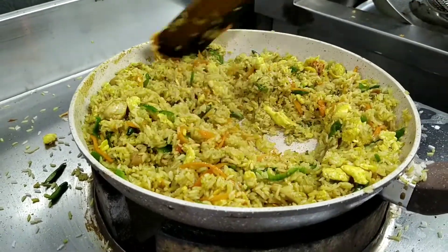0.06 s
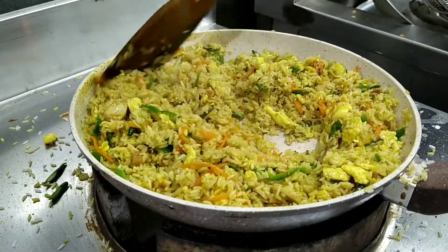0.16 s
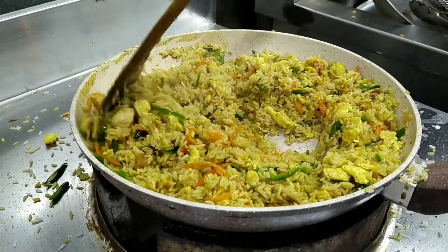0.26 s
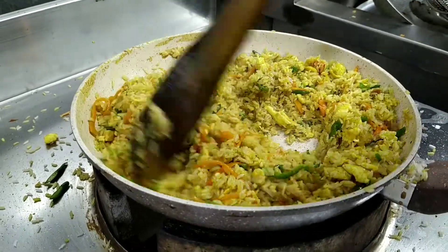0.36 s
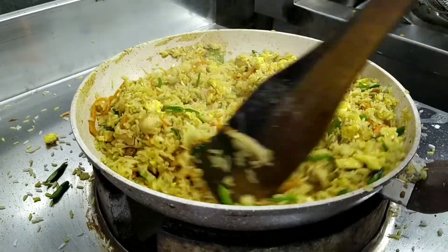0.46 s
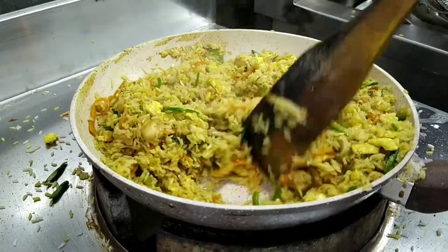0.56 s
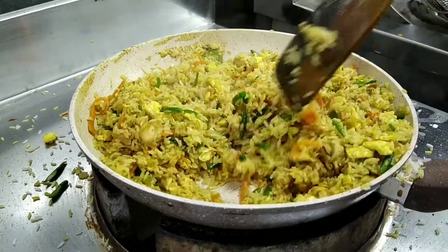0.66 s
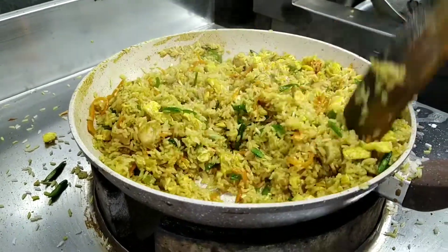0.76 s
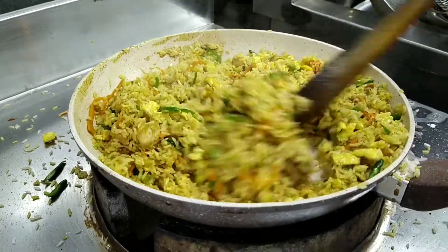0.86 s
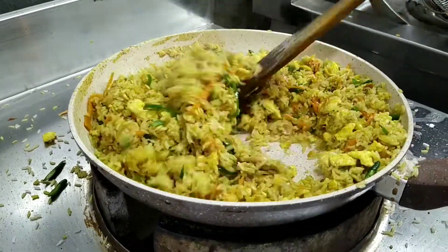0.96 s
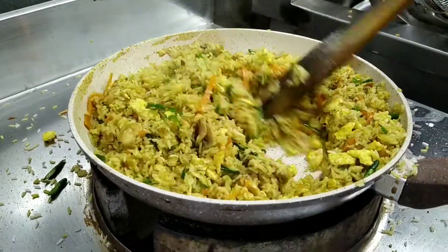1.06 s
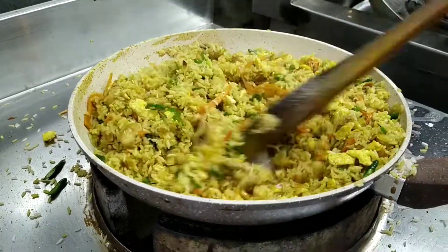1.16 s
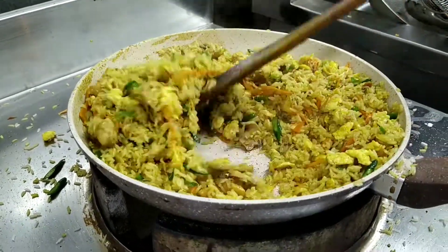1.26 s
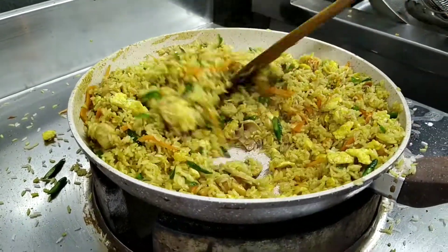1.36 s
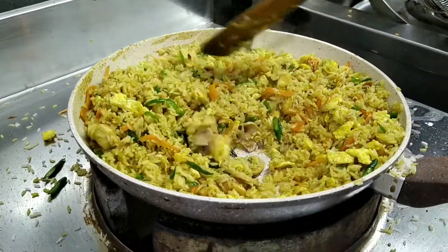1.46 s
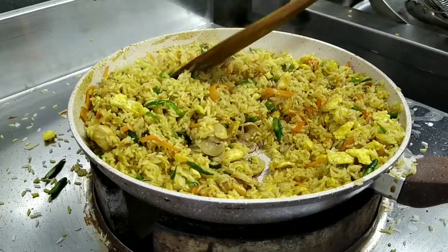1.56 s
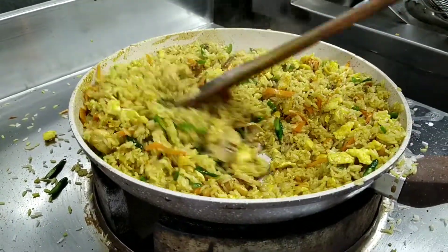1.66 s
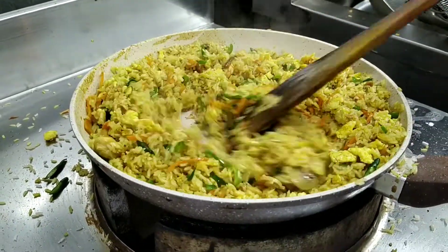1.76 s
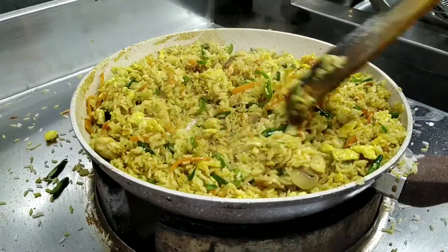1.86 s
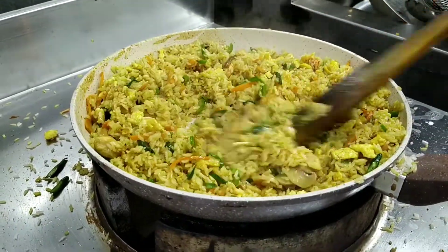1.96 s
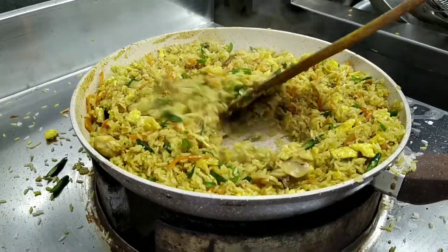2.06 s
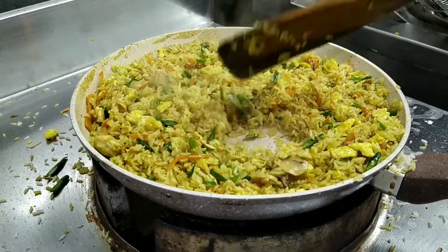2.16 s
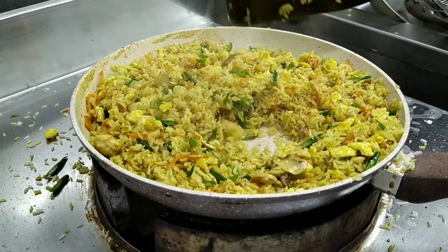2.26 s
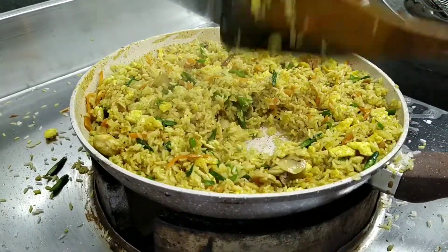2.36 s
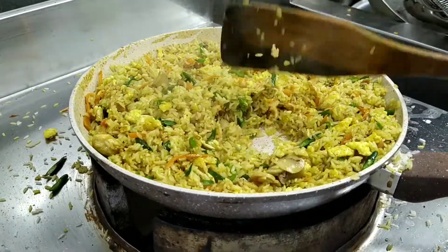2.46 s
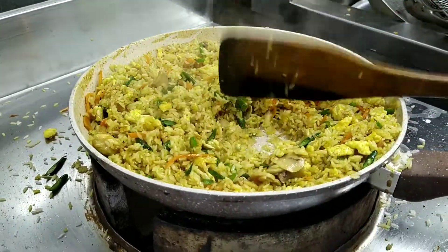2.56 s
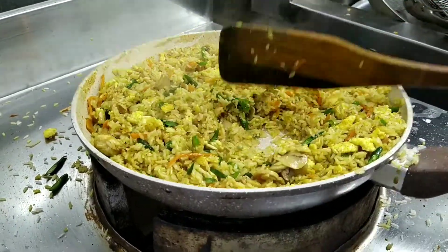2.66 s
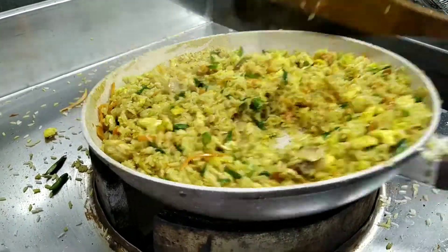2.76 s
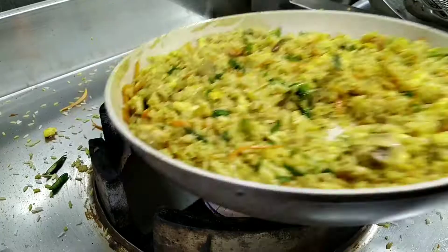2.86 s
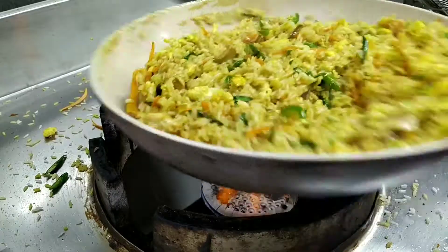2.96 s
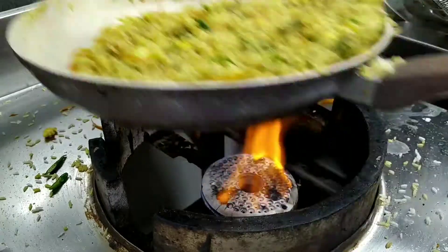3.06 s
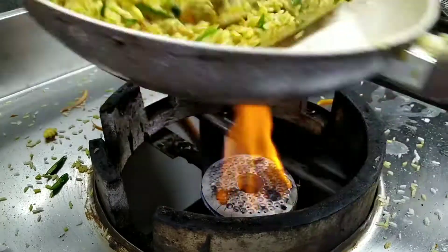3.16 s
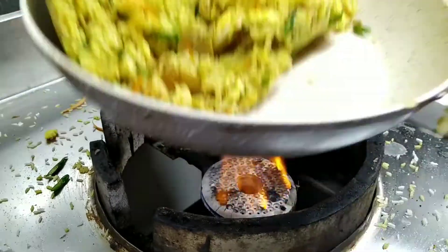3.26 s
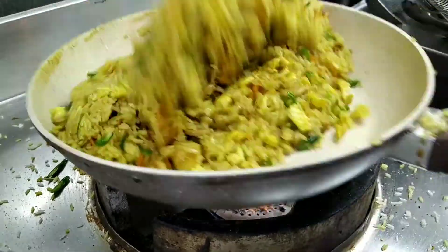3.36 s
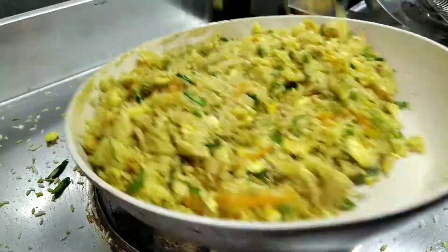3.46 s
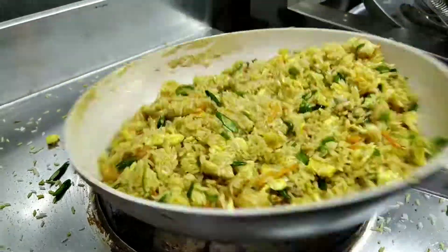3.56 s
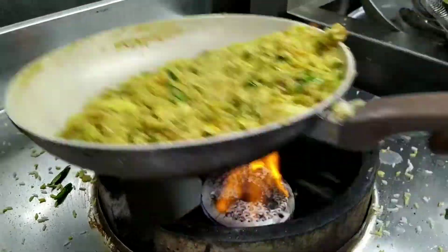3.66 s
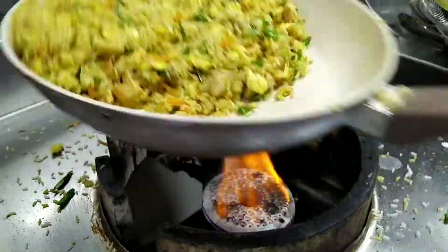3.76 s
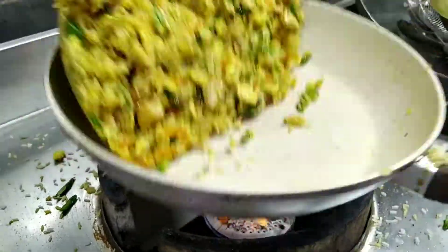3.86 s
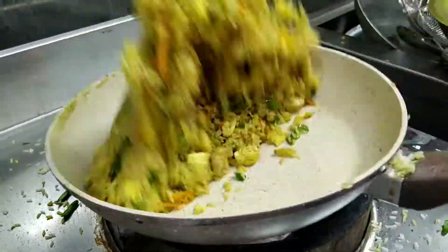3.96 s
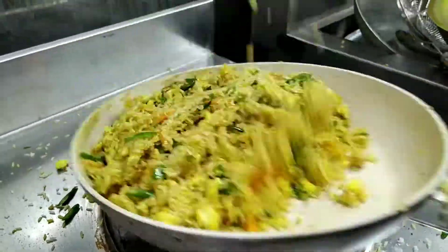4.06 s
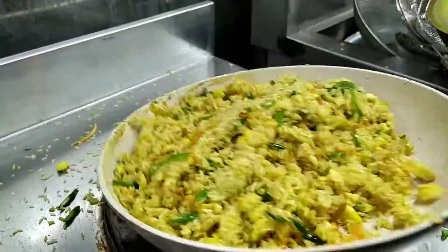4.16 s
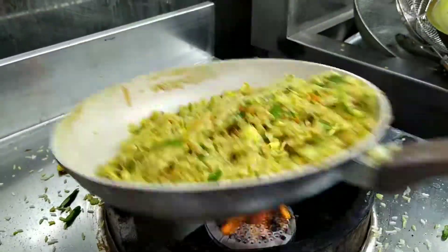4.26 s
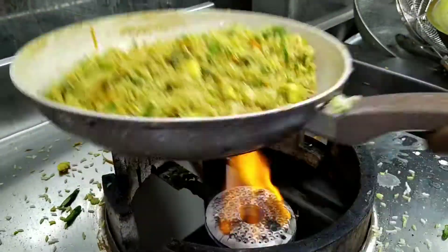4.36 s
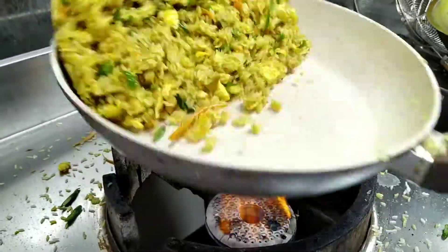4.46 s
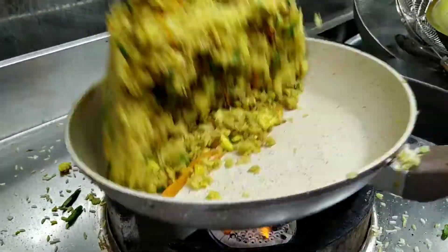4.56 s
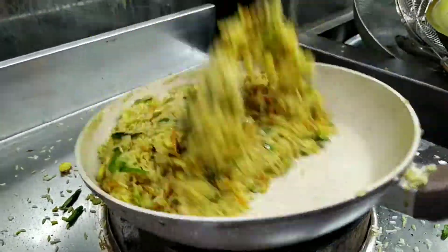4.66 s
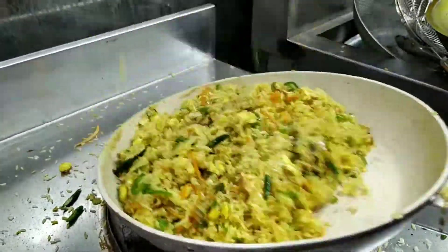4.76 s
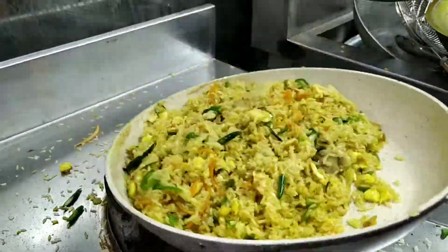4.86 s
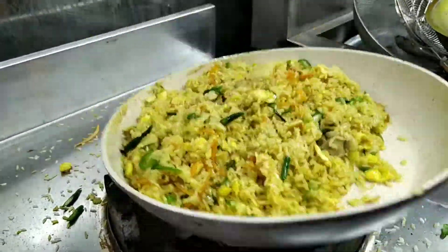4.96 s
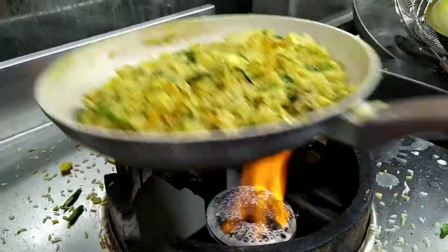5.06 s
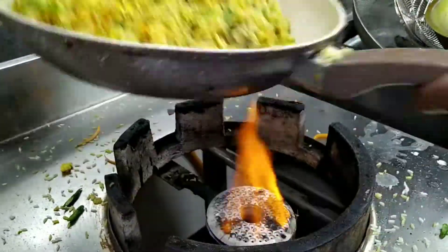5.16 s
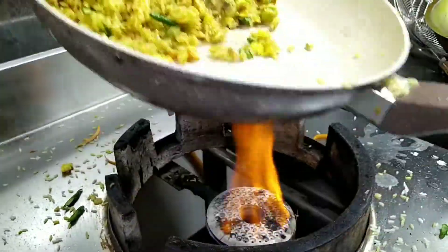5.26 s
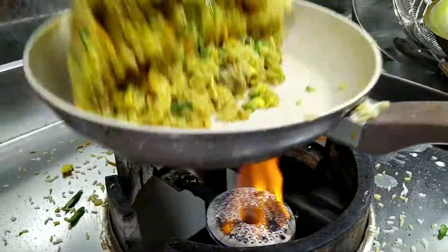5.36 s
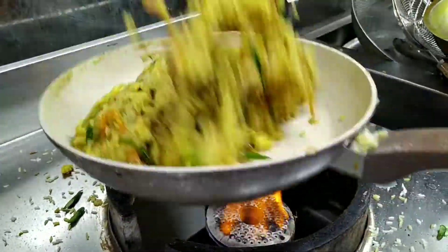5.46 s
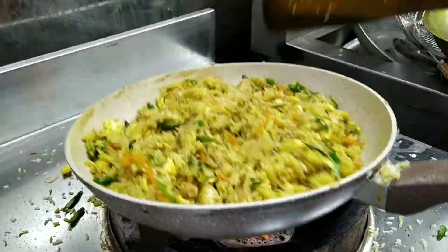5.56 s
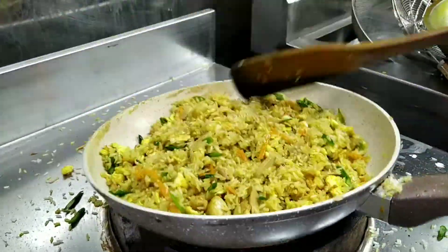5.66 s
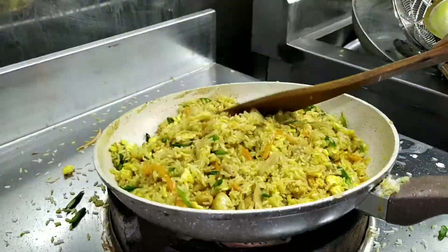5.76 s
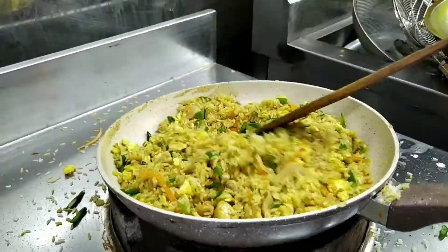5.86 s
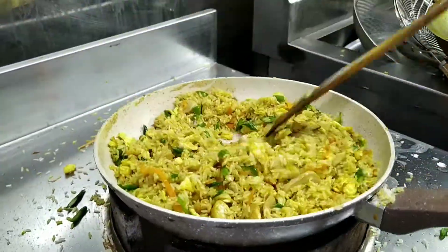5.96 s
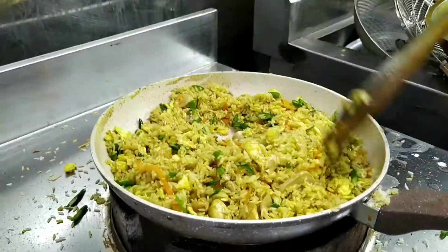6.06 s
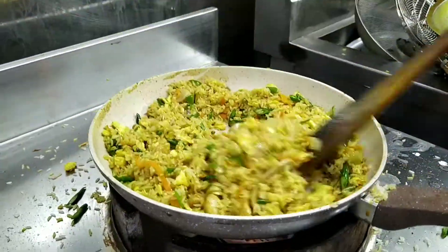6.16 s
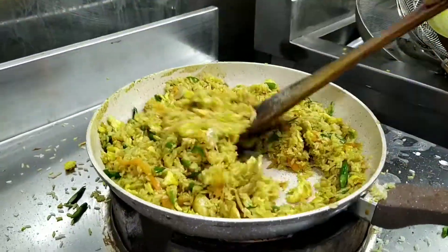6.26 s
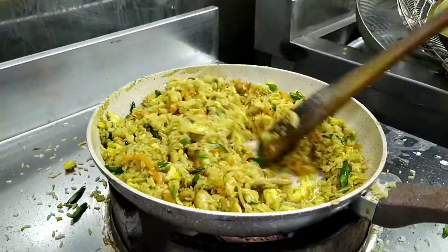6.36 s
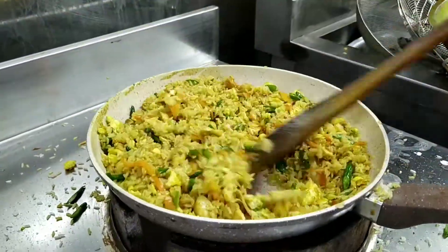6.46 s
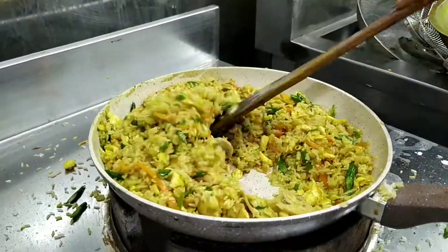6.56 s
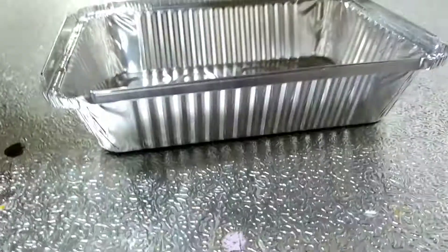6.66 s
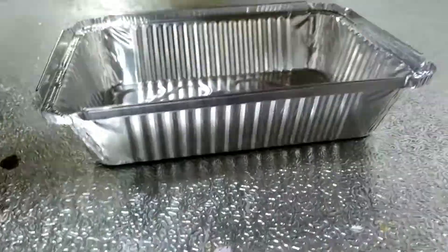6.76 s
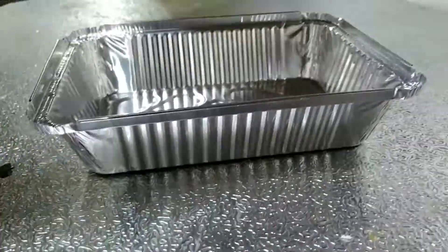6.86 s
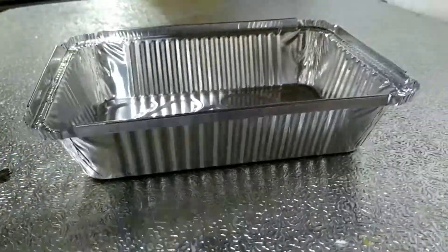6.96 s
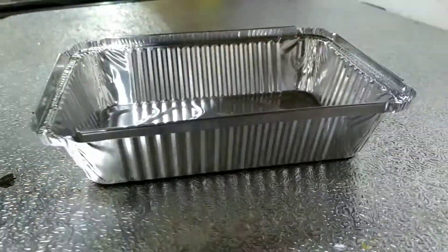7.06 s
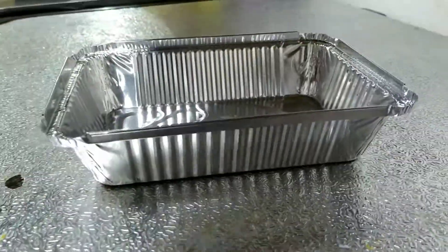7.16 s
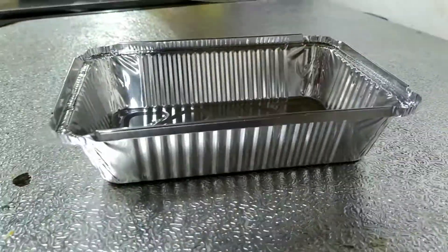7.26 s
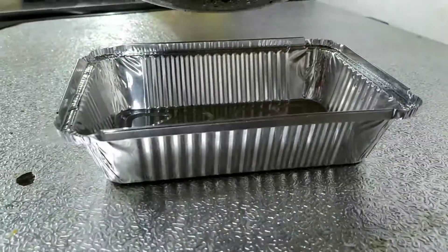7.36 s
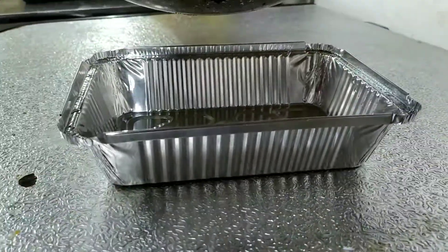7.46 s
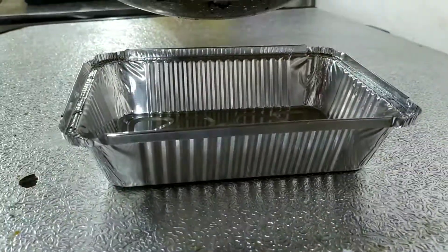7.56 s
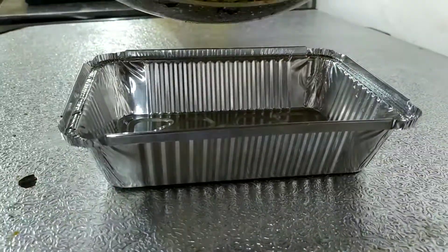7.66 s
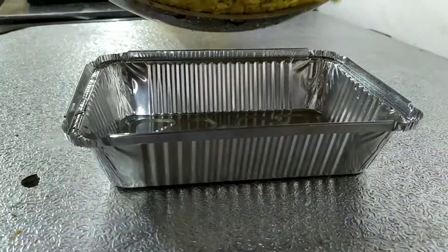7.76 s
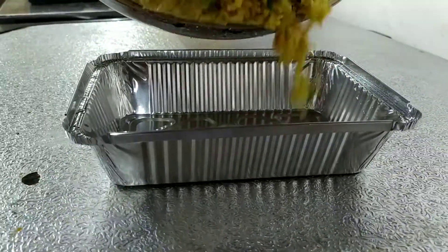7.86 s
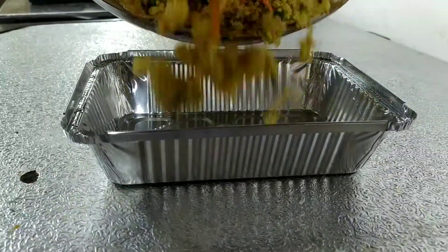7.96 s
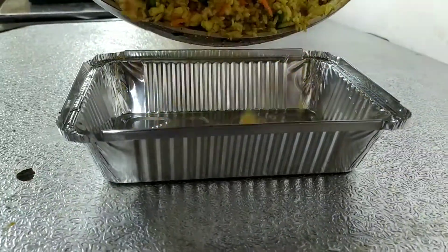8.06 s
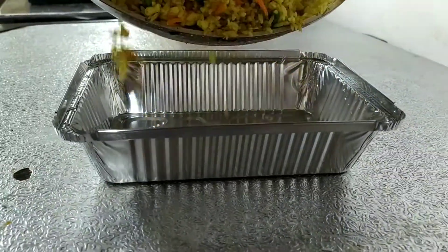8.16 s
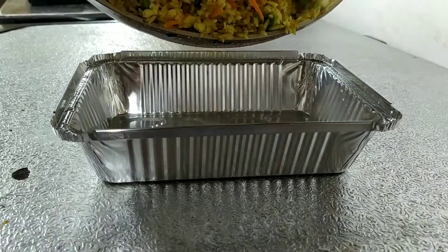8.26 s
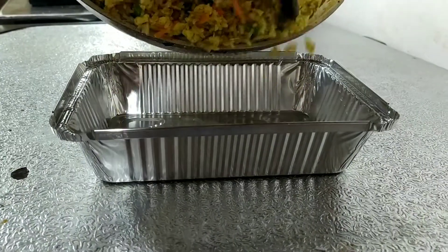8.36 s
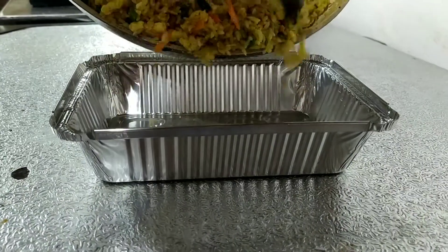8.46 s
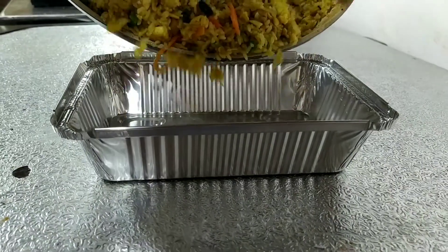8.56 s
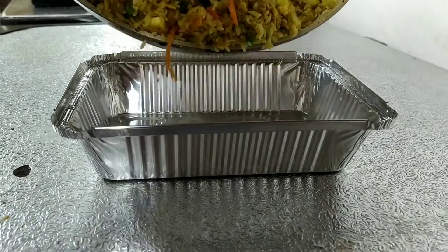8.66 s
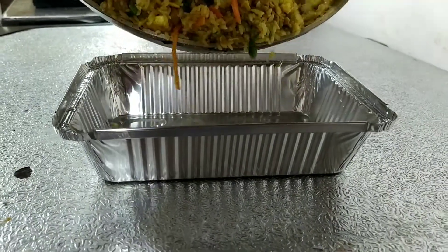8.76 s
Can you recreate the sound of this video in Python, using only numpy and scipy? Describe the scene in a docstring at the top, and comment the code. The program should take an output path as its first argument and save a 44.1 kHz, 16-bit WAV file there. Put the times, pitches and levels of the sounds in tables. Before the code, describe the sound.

Bright oily sizzle swells whenever rice is turned, with sharp spits and wooden knocks. Three heavy pan clangs and a low dragging scrape lead into quieter tossing. More stirring, brief squeaks and a hard final knock follow, cut off suddenly. Then come dull counter bumps and crinkly, light patters of food in thin foil. Close microphone, kitchen worktop, little echo.

```python
"""Rice sizzles in a pan over a low gas flame while a wooden spatula turns it and knocks the pan on a steel range.
Steam bursts are random grains and noise; blows ring decaying modes; scraping is random slips through resonances.
The sizzle flares at each turn of the rice and dips at each toss; the pan is banged, dragged and rubbed.
Then the ringing and scraping stop abruptly, and lumps of rice patter into a foil tray on a bumped counter."""
import sys
import numpy as np
from scipy import signal
from scipy.fft import rfft, irfft, next_fast_len
from scipy.io import wavfile
from scipy.ndimage import map_coordinates

SR = 44100
rng = np.random.default_rng(int(sys.argv[2]) if len(sys.argv) > 2 else 0)


def persist_wave(psi):
    """Save psi, clipped to +-1, as 16-bit WAV."""
    counts = np.round(np.clip(psi, -1, 1) * 32767).astype(np.int16)
    wavfile.write(sys.argv[1], SR, np.atleast_2d(counts).T)


N = 388080


def amp(db):
    """Level in decibels to amplitude ratio."""
    return 10 ** (np.asarray(db) / 20)


def unit(x):
    """Normalise signal power: scale to rms 1."""
    return x / np.sqrt(np.mean(x ** 2) + 1e-20)


def along(points, hz):
    """Interpolate (Hz, value) points on a logarithmic frequency axis."""
    f, v = np.transpose(points)
    return np.interp(np.log(hz + 1), np.log(f + 1), v)


def curve(rows):
    """Linear interpolation of (seconds, value) rows, one value per sample."""
    return np.interp(np.arange(N) / SR, *np.transpose(rows))


def wobble(rate):
    """Band-limited random fluctuation: a smooth curve through `rate` random knots a second."""
    knots = rng.standard_normal(int(N * rate / SR) + 4)
    return map_coordinates(knots, [np.arange(N) * rate / SR])


def filtered(x, response):
    """Linear filtering: multiply the spectrum of x by a response of frequency."""
    n = x.shape[-1]
    m = next_fast_len(n + 8192)
    return irfft(rfft(x, m) * response(np.fft.rfftfreq(m, 1 / SR)), m)[..., :n]


def coloured(pair, spectrum):
    """Interchannel coherence: two unrelated signals become shaped stereo of rms 1, nearly mono in the bass."""
    # Each row: frequency in Hz, correlation of left and right.
    alike = [(100, 0.97), (300, 0.92), (700, 0.62), (2000, 0.061), (5000, 0.011)]

    def mid_side_gains(hz):
        turn = np.arccos(np.clip(along(alike, hz), -1, 1)) / 2
        return amp(along(spectrum, hz)) * [np.cos(turn), np.sin(turn)]

    mid, side = filtered(pair, mid_side_gains)
    return unit(np.array([mid + side, mid - side]))


def burst(t, level_db, t60_s, spectrum):
    """Exponential decay of heavily damped, coloured noise."""
    noise = coloured(rng.standard_normal((2, len(t))), spectrum)
    return amp(level_db - 60 * t / t60_s) * noise


def add(track, s, sound):
    """Superposition: mix a sound into the track at s seconds."""
    room = track[:, max(round(s * SR), 0):][:, :sound.shape[-1]]
    room += sound[..., :room.shape[1]]


def grains(rate, hz, cycles, spread_db, size=96):
    """Shot noise: damped sines at random moments, each with its own pitch, strength and phase per channel."""
    count = int(rate * N / SR)
    when, strength, left, right, pitch = rng.random((count, 5)).T
    # Pitches lie within an octave either side of hz; age counts cycles.
    age = (hz * 4 ** (pitch - .5))[:, None] * np.arange(size) / SR
    strength_db = -spread_db * np.log(1 - .998 * strength)
    shape = amp(strength_db)[:, None] * np.exp(-age / cycles)
    at = ((when * N).astype(int)[:, None] + np.arange(size)).ravel()
    channels = []
    for phase in (left, right):
        pulses = shape * np.sin(2 * np.pi * (age + phase[:, None]))
        channels.append(np.bincount(at, pulses.ravel(), N)[:N])
    return unit(np.array(channels))


def ringing(spectrum):
    """Dense modes of struck metal: noise whose damping depends on frequency."""
    # Each row: frequency in Hz, decay time t60 in seconds.
    damping = [(100, 0.81), (400, 0.74), (900, 0.66), (2500, 0.45), (5000, 0.54), (12000, 0.034)]
    hz, t, z = signal.stft(coloured(rng.standard_normal((2, SR)), spectrum), SR, nperseg=256)
    decay = amp(-60 * t / along(damping, hz)[:, None])
    return signal.istft(z * decay, SR, nperseg=256)[1][:, :SR]


def modes(table, t, scatter_db, phase_spread=0, waver=0):
    """Modal synthesis: decaying sines; reflections scatter phase (radians), loose contact shakes pitch."""
    steady_hz = 210  # modes well below this hardly waver
    out, knots = np.zeros(len(t)), np.arange(200) / 80
    for hz, db, t60 in table:
        strength, phase = rng.standard_normal(2)
        age = t[t < t60]
        walk = np.cumsum(rng.standard_normal(len(knots))) * knots[1]
        drift = np.interp(age, knots, walk)
        turns = hz * (age + waver * drift / (1 + (steady_hz / hz) ** 10))
        level = amp(db + scatter_db * strength - 60 * age / t60)
        out[:len(age)] += level * np.sin(2 * np.pi * turns + phase_spread * phase)
    return out


def placed(x, lag_s):
    """Interaural time difference: a source to the right reaches the left channel lag_s later."""
    sides = np.array([[1], [-1]])
    return filtered(x, lambda hz: np.exp(-1j * np.pi * hz * lag_s * sides))


def burner():
    """Combustion noise: the gas flame's low, broadband roar flutters in level."""
    # Each row: frequency in Hz, gain in dB.
    flame = [(20, -38), (40, -1), (60, 1.5), (88, 5.5), (112, 1.5), (140, -6), (220, -9), (400, -13),
             (700, -18.5), (2000, -18.5), (8000, -26.5)]
    return amp(-52.5 + 1.09 * wobble(6.5)) * coloured(rng.standard_normal((2, N)), flame)


def taps():
    """Heavily damped impacts: small ticks as the pan is handled."""
    # Each row: start in seconds, relative level in dB.
    touches = [(1.77, -37), (5.532, -38.5), (6.71, -32.5)]
    colour = [(300, -7), (1100, 7), (1700, -10), (3000, -27), (8000, -50)]  # Hz, gain in dB
    out, t = np.zeros((2, N)), np.arange(SR // 8) / SR
    for s, db in touches:
        add(out, s, burst(t, db - 9, 0.048, colour))
    return out


def tray():
    """Soft impacts: rice lumps excite foil, ribbed walls and a bass thud; bumps ring the counter's modes."""
    # Each row: start in seconds, level in dB, relative thud in dB, pouring time in seconds, rattle in dB.
    lumps = [(8.028, -38, -17, 0.0018, -23), (8.067, -40.5, -13, 0.022, -4), (8.103, -37.5, -22, 0.008, -6),
             (8.131, -38, -1.5, 0.012, -4), (8.148, -30.5, -21, 0.0054, -3.5), (8.195, -47, -7, 0.025, 1),
             (8.341, -43, -20, 0.004, 1), (8.352, -39, -17, 0.0061, 1.5), (8.38, -48, -11, 0.0093, -4),
             (8.561, -52.5, -11, 0.0066, -10), (8.609, -52, -15, 0.0056, -12),
             (8.657, -46, -18, 0.004, -18), (8.669, -41, -16, 0.0032, -20)]
    # Dull bumps on the counter. Each row: start in seconds, relative level in dB.
    bumps = [(7.133, -24.5), (7.578, -35.5), (8.021, -33.5), (8.246, -35), (8.773, -30.5)]
    # Counter top. Each row: mode frequency in Hz, level in dB, decay time t60 in seconds.
    counter = [(217, -4, 0.028), (282, 4, 0.041), (380, -10, 0.09), (453, -11.5, 0.17), (538, -6, 0.1)]
    # Colour of the foil. Each row: frequency in Hz, gain in dB.
    foil = [(180, -49), (300, -17), (462, -3), (620, -6.5), (834, 1.5), (926, -15), (1040, 7.5), (1150, -4),
            (1330, 6), (1460, -23), (1610, -6), (2100, -18), (2820, -13), (3500, -10), (4800, -12.5),
            (6370, -14), (12000, -21.5), (15600, -53)]
    # Buzz of the tray's ribbed walls. Each row: frequency in Hz, gain in dB.
    ribs = [(700, -22), (1400, 5.5), (2100, 3), (3600, -4), (5200, -13), (9000, -30)]
    thud_colour = [(30, -23), (90, 2.5), (180, -15.5), (400, -23), (2000, -56)]  # Hz, gain in dB
    out, t = np.zeros((2, N)), np.arange(SR // 3) / SR
    rise = 1 - np.exp(-t / 0.0006)
    tick = 1 + 0.66 * np.exp(-t / 0.001)  # sharper at first contact

    def grainy(colour):
        return coloured(rng.standard_normal((2, len(t))) * amp(5.0 * rng.standard_normal(len(t))), colour)

    for s, db, thud_db, pour_s, rattle_db in lumps:
        patter = grainy(foil) + amp(rattle_db) * grainy(ribs)
        # Steady while pouring, then a quick decay, over a weak slow tail.
        fall = amp(-60 * np.maximum(t - pour_s, 0) / 0.086) + amp(-12.5 - 60 * t / 0.54)
        thud = burst(t, thud_db + 6.0, 0.29, thud_colour)
        add(out, s, amp(db) * rise * (tick * fall * patter + thud))
    for s, db in bumps:
        bump = modes(counter, t, scatter_db=1, phase_spread=1.5, waver=0.015)
        add(out, s, amp(db - 3.5) * (1 - np.exp(-t / 0.004)) * bump)
    return out


def squeaks():
    """Stick-slip friction: the blade sticks and one pan mode swells and fades at an unsteady pitch."""
    # Each row: centre in seconds, frequency in Hz, level in dB, time from the peak to 1/e in seconds.
    rubs = [(6.298, 2417, -35, 0.01), (6.326, 2417, -41, 0.014), (6.305, 2713, -44, 0.025),
            (6.442, 2713, -40, 0.01), (6.478, 2713, -43, 0.014), (6.52, 2713, -40, 0.014)]
    t, out = np.arange(N) / SR, np.zeros(N)
    for s, hz, db, half_s in rubs:
        swell = np.exp(-((t - s) / half_s) ** 2)
        out += amp(db) * swell * np.sin(2 * np.pi * hz * t + 0.7 * wobble(120))
    return out


def juddering():
    """Resonance under random slips: low pan modes come and go as the contact point moves."""
    # Pan on its support. Each row: resonance in Hz, bandwidth in Hz, level in dB.
    resonances = [(332, 35, 6.5), (442, 44, 1), (516, 22, -4.5), (604, 62, 3.5), (788, 30, 3),
                  (940, 50, -6)]
    slips = grains(rate=900, hz=600, cycles=0.6, spread_db=0.5) + 0.6 * rng.standard_normal((2, N))
    slips = coloured(slips, [(120, -19), (300, 1.5), (1000, -0.5), (2000, -14)])
    out = np.zeros((2, N))
    for hz, width, db in resonances:
        mode = signal.lfilter(*signal.iirpeak(hz, hz / width, SR), slips)
        out += amp(db + 1.5 * wobble(14)) * mode
    return unit(out)


def drags():
    """Sliding friction: slips shake the pan and the blade rasps; each stroke builds up, then eases off."""
    # Each row: hardest push in seconds, relative level in dB, build-up in seconds, fade in dB per second,
    # then rasp and judder in relative dB.
    strokes = [(1.005, -31.5, 0.041, 94, -5.5, -7), (1.3, -44, 0.11, 105, 1.5, 3),
               (1.75, -49, 0.084, 77, -10, -17), (2.14, -52.5, 0.083, 124, -4, 1),
               (2.86, -24, 0.21, 70.5, -10, 3), (2.945, -42, 0.084, 103, -9, -5),
               (4.74, -49.5, 0.1, 18, -20, -11.5), (4.942, -50, 0.034, 122, -4, 3),
               (5.05, -52, 0.33, 215, -13, -17), (5.9, -42, 0.096, 49, -4, 5),
               (6.01, -29.5, 0.049, 77, -7.5, -2.5), (6.09, -33, 0.08, 50, -27, -10),
               (6.217, -30, 0.013, 300, -23, 2.5), (6.3, -35.5, 0.034, 72, -2.5, -4)]
    # Scraping pan. Each row: frequency in Hz, gain in dB.
    scrape_colour = [(25, -25), (50, 10), (76, 26), (108, 22), (130, -1), (160, 20.5), (235, 10), (320, 11),
                     (430, 5.5), (650, -2.5), (1000, -2), (2000, 1), (4000, -29)]
    # Blade over the pan floor. Each row: frequency in Hz, gain in dB.
    rasp_colour = [(200, -22), (330, -3), (620, 5.5), (800, -7), (1100, 6.5), (1400, -2), (1750, -2),
                   (2300, 11.5), (4000, -29)]
    t = np.arange(N) / SR
    force, bite, shake = np.zeros((3, N))
    for s, db, build_s, fade, rasp_db, judder_db in strokes:
        stroke = np.clip(1 + (t - s) / build_s, 0, 1) * amp(db - fade * np.maximum(t - s, 0))
        force += stroke
        bite += amp(rasp_db) * stroke
        shake += amp(judder_db) * stroke
    slips = grains(rate=260, hz=874, cycles=0.81, spread_db=1.0) + 2.0 * rng.standard_normal((2, N))
    grit = grains(rate=400, hz=1160, cycles=1.0, spread_db=-4.0) + 0.39 * rng.standard_normal((2, N))
    grip = amp(1.8 * wobble(45))  # the blade catches and lets go
    scrape = amp(-5.0) * force * coloured(slips, scrape_colour)
    rasp = amp(-3.5) * bite * coloured(grit, rasp_colour)
    judder = amp(-5.5) * shake * juddering()
    return scrape + grip * (rasp + judder)


def knocks():
    """Impact excitation of modes: the pan clangs, the range booms beneath and the spatula clacks."""
    # Each row: start in seconds, relative level in dB, then relative dB of the range's boom,
    # the pan body's thud, the clang and the wooden clack.
    blows = [(0.189, -53, -2, -19, 2, -7), (0.943, -20, -21.5, -12.5, -5, 2),
             (0.947, -25.5, -33, -13, -12, 3), (1.215, -25, -15, -14, -22, -3),
             (1.221, -30, -14, -12, -20, -2), (1.687, -39, -6, -18, -10, 2),
             (2.083, -35, -16, -10.5, -9, 3.5), (2.521, -13, -3, -8, 3.5, -29),
             (2.685, -10, -3.5, -12, 0.5, -22), (2.819, -14, 0, -8, -15, -32),
             (5.802, -25.5, -4, -7, -28, -4), (5.928, -24.5, -16, -8, -14, -4),
             (5.986, -19, -13.5, -10.5, -15, -12), (6.13, -32.5, -7, -8, -28, -12),
             (6.154, -23, -7.5, -13.5, -19, -1.5), (6.213, -21, -7, -15, -25, -13),
             (6.624, -12.5, -15.5, -11.5, -15, -4.5), (6.627, -18.5, -13, -10, -10.5, -2),
             (6.634, -25, -14, -16, -4, 1)]
    # Sheet steel of the range. Each row: mode frequency in Hz, level in dB, decay time t60 in seconds.
    range_modes = [(58, -23, 1.3), (72.65, -10.5, 2.9), (87, -16, 1.3), (108.24, -1, 2.12), (124, -17, 1.3),
                   (144.2, -6.5, 2.2), (166, -18, 1.3), (194, -12.5, 1.1), (241.5, -4.5, 0.69),
                   (267, -8, 0.9), (320.5, -4, 0.65), (349, -9, 0.75), (431, -6, 0.48), (514, -9.5, 0.8),
                   (597, -16, 0.75)]
    # The pan itself. Each row: mode frequency in Hz, level in dB, decay time t60 in seconds.
    pan_modes = [(797, -2.5, 0.8), (985, -4, 0.5), (1276, 1.5, 0.55), (1365, -4, 0.6), (1448, -3, 0.5),
                 (1518, 1, 0.5), (1665, -1, 0.8), (1798, -7, 0.6), (2255, 1, 0.4), (2380, -2, 0.45),
                 (2557, -3, 0.5), (2630, 3, 0.6), (2663, 2, 0.55), (2713, 5.5, 0.6), (2850, -5, 0.45),
                 (3155, -6, 0.55), (3526, -7, 0.42)]
    # Wooden blade. Each row: mode frequency in Hz, level in dB, decay time t60 in seconds.
    wood_modes = [(431, 4, 0.18), (537, -3, 0.22), (660, -6, 0.26), (824, -5, 0.16), (1112, -2.5, 0.25),
                  (1644, -0.5, 0.23), (1853, -0.5, 0.3), (2360, -11, 0.05), (2700, -16, 0.05),
                  (3260, -2.5, 0.053)]
    # Dense modes of the pan body. Each row: frequency in Hz, gain in dB.
    body_colour = [(30, -35), (50, -20), (75, 2.5), (150, 4.5), (235, -19), (330, -1.5), (450, 3.5),
                   (540, -20), (650, -9), (850, -1.5), (1100, -5), (1700, -8.5), (2200, -27), (3000, -20.5)]
    # Dense modes of the clang. Each row: frequency in Hz, gain in dB.
    clang_colour = [(600, -21), (1100, -5), (1550, 2), (1950, -2), (2300, 6), (2750, 1), (3200, -2),
                    (3700, -10), (5000, -12), (8000, -21), (15000, -32)]
    # Dry edge of the blade's first touch. Each row: frequency in Hz, gain in dB.
    edge_colour = [(150, -11), (350, 0), (800, 0.5), (1700, 1), (2400, -8), (4000, -35), (9000, -38)]
    # Bright crack of metal on metal. Each row: frequency in Hz, gain in dB.
    crack_colour = [(1000, -20), (2400, 6), (3250, 0.5), (3800, -13), (5200, -6), (9000, -15.5),
                    (15000, -27)]
    out, t = np.zeros((2, N)), np.arange(2 * SR) / SR
    t_pan, t_touch = t[:SR], t[:SR // 8]
    contact = 1 + 0.98 * np.exp(-(t_pan / 0.0042) ** 2)  # chatter strengthens the first milliseconds
    swell = 1 - np.exp(-t / 0.0037)  # the large sheets take a moment to move
    # The range is still humming from earlier stirring.
    add(out, 0, amp(-45.5) * modes(range_modes[:8], t, scatter_db=0))
    for s, db, boom_db, thud_db, clang_db, wood_db in blows:
        thud = amp(thud_db) * swell[:SR] * ringing(body_colour)
        clang = amp(clang_db - 6.5) * ringing(clang_colour)
        tones = [modes(pan_modes, t_pan, scatter_db=3.5, phase_spread=2.32, waver=0.0013)
                 for channel in range(2)]
        clack = modes(wood_modes, t_pan, scatter_db=5.0, phase_spread=np.pi, waver=0.0088)
        pan = thud + clang + amp(clang_db - 24.0) * np.array(tones) + amp(wood_db - 16.5) * clack
        add(out, s, amp(db) * contact * pan)
        edge = burst(t_touch, wood_db - 8, 0.045, edge_colour)
        crack = burst(t_touch, clang_db - 11, 0.06, crack_colour)
        add(out, s, amp(db) * (edge + crack))
        boom = modes(range_modes, t, scatter_db=3.5, waver=0.027)
        add(out, s, amp(db + boom_db - 5.5) * swell * boom)
    return out


def frying_db():
    """Heat transfer sets the level: contact with hot metal flares the sizzle, a toss makes it dip."""
    # Resting rice. Each row: time in seconds, relative sizzle level in dB.
    heat = [(0, -39.5), (2.45, -42), (2.9, -36.5), (4.5, -42), (4.9, -45.5), (5.3, -43), (5.7, -49.5),
            (6.6, -43), (6.7, -47), (8.8, -48)]
    # Wet rice turned onto hot metal. Each row: time of the height in seconds, rise in dB.
    flares = [(0.28, 3.5), (0.67, 4.5), (0.97, 6), (1.15, 3), (1.52, 0.5), (1.78, 6.5), (2.12, 5),
              (2.61, 5.5), (2.85, 2), (5.12, 4), (5.64, 4), (5.9, 5.5), (6.46, 2.5), (7.18, 4)]
    # Rice leaving the pan. Each row: top of the throw in seconds, drop in dB.
    tosses = [(3.392, 12.5), (4.035, 15.5), (4.675, 10.5), (5.455, 11)]
    t, level = np.arange(N) / SR, curve(heat)

    def swell(s, rise_s, fade_s):
        return np.clip(1 + (t - s) / rise_s, 0, 1) * np.exp(-np.maximum(t - s, 0) / fade_s)

    for s, db in flares:
        level = level + db * swell(s, rise_s=0.1, fade_s=0.087)
    for s, db in tosses:
        level = level - db * swell(s, rise_s=0.11, fade_s=0.079)
    return level


def sizzle():
    """Explosive boiling: water bursts from hot oil as fine fizz, lower moist crackle, pops and single spits."""
    # Moist crackle of the turned rice. Each row: time in seconds, level relative to the sizzle in dB.
    moist = [(0, -3.5), (0.9, -1), (2.4, -1.5), (4.1, 1.5), (5.6, 1.5), (6.5, 2.5), (6.7, -2), (8.8, 0)]
    # Single spits of oil. Each row: start in seconds, relative level in dB.
    spits = [(0.0672, -27), (0.6509, -28), (0.792, -28), (1.144, -10), (1.371, -15), (1.51, -21),
             (1.645, -14.5), (1.751, -8), (2.0617, -13), (2.427, -16), (2.472, -13.5), (2.545, -11),
             (2.614, -5.5), (5.48, -28), (6.7825, -24), (6.975, -32), (7.405, -21.5), (8.3873, -19),
             (8.49, -21), (8.5809, -25), (8.7136, -28)]
    # Oil fizz. Each row: frequency in Hz, gain in dB.
    fizz_colour = [(2000, -16.5), (4000, -8.5), (6000, -3), (7600, 0), (10500, -4), (13000, -1),
                   (15500, -7)]
    # Moist crackle. Each row: frequency in Hz, gain in dB.
    crackle_colour = [(200, -6), (600, -20.5), (1000, -9), (1800, -4.5), (2700, 3), (4300, 0.5),
                      (6000, -4.5), (10000, -3.5)]
    # A spit. Each row: frequency in Hz, gain in dB.
    spit_colour = [(500, -16), (2000, -2), (4000, 2), (5700, -3), (7600, 3), (10500, -3.5), (15500, -4)]
    heat_db = frying_db() + 1.03 * wobble(30) + 0.52 * wobble(110)
    fizz = grains(rate=2200, hz=8030, cycles=1.7, spread_db=-0.5) + 1.63 * rng.standard_normal((2, N))
    crackle = grains(rate=1300, hz=2940, cycles=0.67, spread_db=1.0) + 3.64 * rng.standard_normal((2, N))
    pops = grains(rate=45, hz=7000, cycles=3, spread_db=1.2)
    out = amp(heat_db + 1.27) * coloured(unit(fizz) + amp(-13) * pops, fizz_colour)
    moist_db = curve(moist) + 0.9 * wobble(24)
    out += amp(heat_db + moist_db) * coloured(crackle, crackle_colour)
    # The part above about 10.5 kHz is turned down, more so where the moist crackle is strong.
    upper = filtered(out, lambda hz: 1 / (1 + (10500 / (hz + 1)) ** 8))
    out += (amp(-4.5 - .5 * curve(moist)) - 1) * upper
    t = np.arange(SR // 50) / SR
    for s, db in spits:
        add(out, s, burst(t, db - 16.5, 0.03, spit_colour))
    return out


def scene():
    """Superposed sources: stove and tray stand a little to the right; the stove's ringing stops dead."""
    stove_end_s, fade_s = 6.673, .006
    at_stove = np.clip((stove_end_s - np.arange(N) / SR) / fade_s + .5, 0, 1)
    stove = (knocks() + drags() + squeaks()) * at_stove + taps()
    struck = placed(stove, lag_s=0.00018) + placed(tray(), lag_s=0.0002)
    flame = burner() * amp(-2.5 * (1 - at_stove))  # softer after the stove's ringing ends
    return struck + sizzle() + flame


def record(dry):
    """Transducer response: channel colours, a rumble filter, soft saturation of peaks, then a band limit."""
    # Each row: frequency in Hz, left minus right in dB.
    ports = [(60, -3.5), (99, -1), (160, 1), (270, 0), (450, 2), (740, -1), (1220, 1), (2010, 2.5),
             (3330, 3.0), (5500, 3), (9080, -8.5), (15000, -8)]
    halves = np.array([[.5], [-.5]])
    x = filtered(dry, lambda hz: amp(along(ports, hz) * halves))
    x = signal.sosfilt(signal.butter(2, 32, 'highpass', fs=SR, output='sos'), x)
    x = x / (1 + np.abs(x / .85) ** 4) ** (1 / 4)
    return filtered(x, lambda hz: hz < 15700)


dry = scene()
out = record(dry)
persist_wave(out)
```